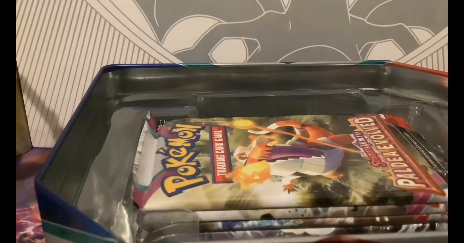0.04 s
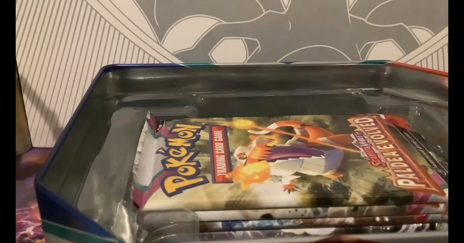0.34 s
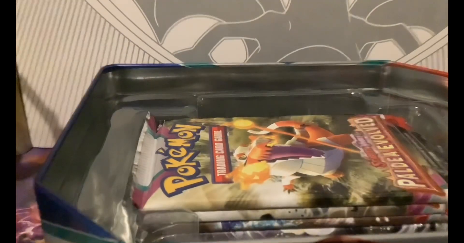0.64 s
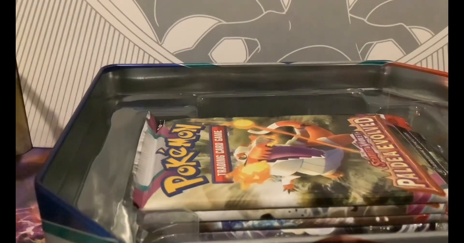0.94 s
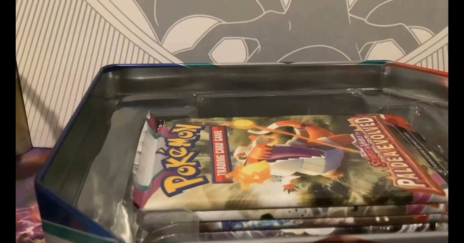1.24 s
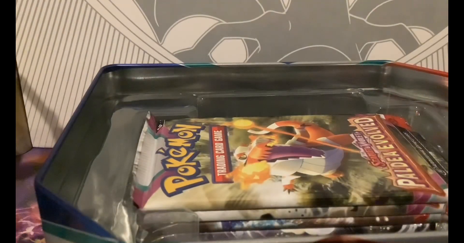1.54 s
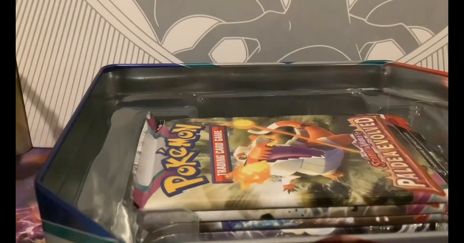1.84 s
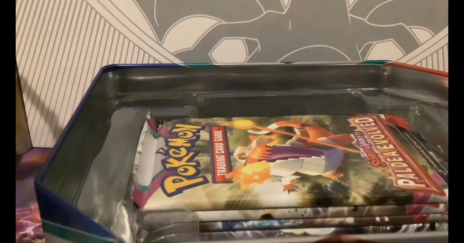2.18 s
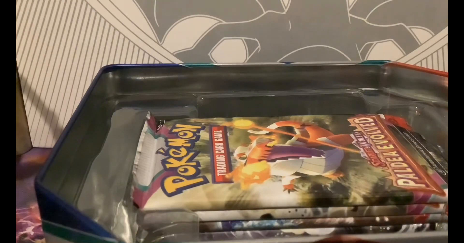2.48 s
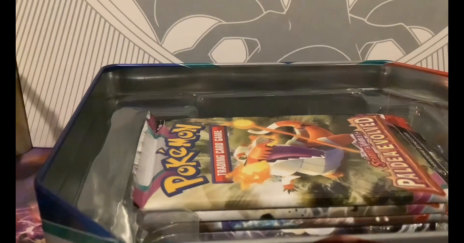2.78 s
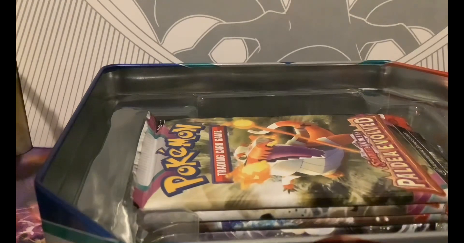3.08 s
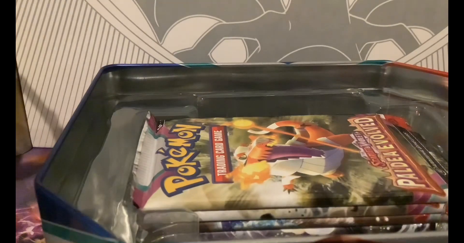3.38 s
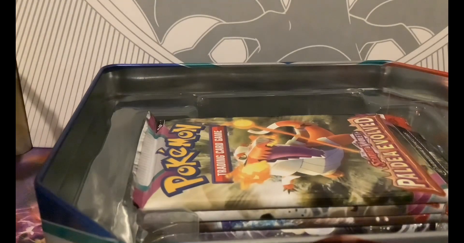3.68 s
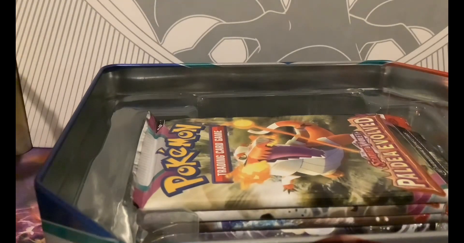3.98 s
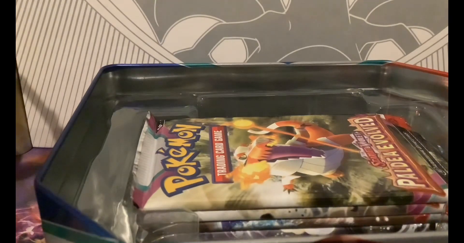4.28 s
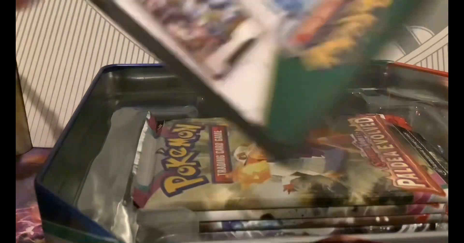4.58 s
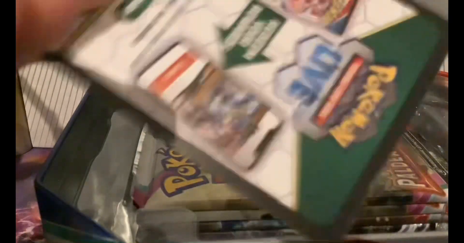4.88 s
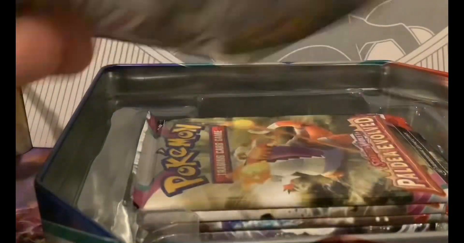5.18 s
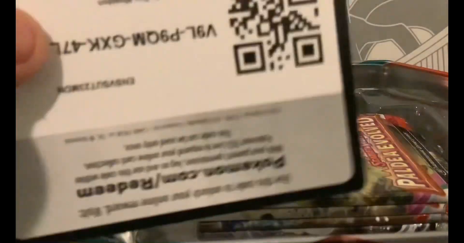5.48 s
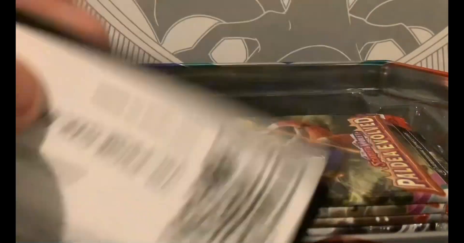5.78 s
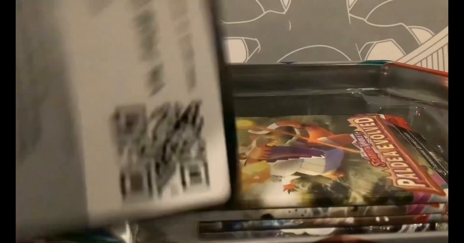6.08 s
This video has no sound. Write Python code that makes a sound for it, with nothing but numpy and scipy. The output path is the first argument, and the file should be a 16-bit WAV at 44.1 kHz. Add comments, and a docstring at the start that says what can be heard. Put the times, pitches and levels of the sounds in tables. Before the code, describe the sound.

Faint plastic ticks open the scene as hands work an insert inside a metal tin, close by. At about 0.6 seconds the plastic cracks and the tin bumps down on a table with a low thump. A sharp, loud snap comes at 1.1 seconds, followed by scraping, crackles and dull knocks until 1.7, the sheet metal ringing briefly with them. A lull follows, with only a faint rub and a small bump. Around 3 seconds the plastic scrapes and snaps again in a short, bright burst. Then a card slides free with a fine, soft hiss until about 4.5 seconds, ticking once at 3.7. From 4.3 to 5.4 seconds fingers flick, brush and tap the card, making light clicks and padded touches. A last soft swish comes near 6 seconds. Behind everything is a small, quiet room with a faint mains hum.

```python
"""A plastic insert scrapes and snaps as hands work it and cards out of a metal card tin, close by.
The insert sticks and slips along the wall, and the sheet metal rings with it; the tin bumps and lands
on the table with a low thump. A card slides free with a fine hiss and is flicked, brushed and tapped
in the fingers. Behind it all: a small room and a faint mains hum."""
import sys
import numpy as np
from scipy import signal
from scipy.fft import rfft, irfft
from scipy.io import wavfile
from scipy.ndimage import uniform_filter1d, map_coordinates

SR = 44100
rng = np.random.default_rng(int(sys.argv[2]) if len(sys.argv) > 2 else 0)


def log_audio(samples):
    """Write samples as a 16-bit WAV file to the path given in sys.argv[1]."""
    # one column per channel
    frames = np.atleast_2d(samples).T
    # limit to full scale, then quantise
    limited = np.clip(frames, -1, 1)
    pcm = np.round(limited * 32767).astype(np.int16)
    wavfile.write(sys.argv[1], SR, pcm)


N = 270333
T = np.arange(N) / SR
SOUND_M_S = 343


def amp(db):
    """Decibels to gain."""
    return 10 ** (np.asarray(db) / 20)


def unit(x):
    """Scale to rms 1."""
    return x / np.sqrt(np.mean(x ** 2))


def colour(x, points):
    """Shape by (f/Hz, level/dB) points; rms 1."""
    hz, db = np.transpose(points)
    log_hz = np.log(np.fft.rfftfreq(N, 1 / SR) + 1)
    return unit(irfft(rfft(x) * amp(np.interp(log_hz, np.log(hz), db)), N))


def band(x, hz, q):
    """Two-pole resonance, gain 1 at the centre."""
    w = 2 * np.pi * hz / SR
    a = np.sin(w) / (2 * q)
    return signal.lfilter([a, 0, -a], [1 + a, -2 * np.cos(w), 1 - a], x)


def muffle(x, hz):
    """One-pole low-pass."""
    return signal.sosfilt(signal.butter(1, hz, fs=SR, output="sos"), x)


def fade(t, t60_s):
    """Exponential decay."""
    return np.exp(-np.log(1000) * t / t60_s)


def walk(rate_hz):
    """Random wander, spread near 1."""
    step = int(SR / rate_hz)
    return uniform_filter1d(np.repeat(rng.standard_normal(N // step + 1), step), step)[:N]


def add(out, start_s, x):
    """Mix x into out."""
    i = max(int(start_s * SR), 0)
    out[i:i + len(x)] += x[:N - i]


def burst(envelope, hz, q, body):
    """Crackle with the envelope's energy: a resonance (Q capped) plus a broader body."""
    q = min(q, 3.5)
    broad = band(rng.choice([-1., 1.], len(envelope)) * envelope, hz, q)
    crackle = band(broad, hz, q) + body * broad
    return crackle * np.sqrt(np.sum(envelope ** 2) / np.sum(crackle ** 2))


def friction(per_s, spread_db, hiss):
    """Stick-slip grains of unequal size over smooth hiss."""
    grains = (rng.random(N) < per_s / SR) * rng.choice([-1., 1.], N)
    sizes = amp(spread_db * np.minimum(rng.exponential(size=N), 4))
    return unit(grains * sizes) + hiss * rng.standard_normal(N)


def stroke(start_s, length_s, exponent):
    """Loudness as a power of hand speed, from rest to rest."""
    speed = np.sin(np.pi * np.clip((T - start_s) / length_s, 0, 1))
    return np.maximum(speed, 0) ** exponent


# room air spectrum: f/Hz, level/dB
AIR_SPECTRUM = [(30, -40.5), (50, -14.5), (105, -5.5), (220, -18), (420, -27), (560, -22), (850, -38),
                (1600, -46), (11000, -51), (16000, -60)]

def background():
    """Still room air and a wavering mains hum."""
    air = colour(rng.standard_normal(N), AIR_SPECTRUM) * amp(-66.5 + walk(15))
    hum = amp(-65) * np.sin(2 * np.pi * 100.4 * T + 1.4 * walk(6.5)) * amp(2 * walk(10))
    return air + hum


# pushes on the insert: t/s, hold/s, level/dB
PUSHES = [(-.04, .43, -62), (0.526, 0.13, -53), (0.875, 0.87, -65), (1.133, 0.079, -39), (1.266, .06, -56),
          (1.332, 0.013, -43), (1.366, 0.11, -58), (1.493, 0.032, -50.5), (1.562, .04, -58),
          (1.594, 0.01, -44), (1.647, 0.13, -59.5), (1.776, 0.18, -68.5), (2.991, 0.029, -54),
          (3.005, .032, -38), (3.065, 0.034, -36.5), (3.085, 0.034, -32.5)]

def push_force(release_s=.027, creep_s=.19, creep_db=-23.5):
    """Each push grips, holds, lets go and creeps on; long pushes grip gently."""
    power = 0
    for start_s, hold_s, db in PUSHES:
        grip_s = .0017 + .013 * hold_s
        grip = 1 - np.exp(-np.maximum(T - start_s, 0) / grip_s)
        after_s = np.maximum(T - start_s - hold_s, 0)
        release = np.exp(-after_s / release_s) + amp(creep_db) * np.exp(-after_s / creep_s)
        power += (amp(db) * grip * release) ** 2
    return np.sqrt(power)


# judder spectrum: f/Hz, level/dB
JUDDER_SPECTRUM = [(35, -43.5), (60, -13.5), (207, -1), (363, -11), (585, -1), (698, -5.5), (1000, -9.5),
                   (1310, -17), (1780, -13.5), (4750, -12), (9790, -20.5), (16000, -25)]

def scrape(force, bite_db=-50, treble_floor=.065, catches_per_s=300, catch_s=.0011):
    """The insert judders along the tin wall; pressed harder, it brightens and catches."""
    slips = friction(per_s=3500, spread_db=3, hiss=.5)
    judder = colour(slips, JUDDER_SPECTRUM) * amp(2 * walk(170))
    dull = muffle(judder, hz=1702)
    onsets = rng.random(N) < catches_per_s / SR
    sizes = amp(4 * np.minimum(rng.standard_normal(N), 2))
    decays = signal.lfilter([1], [1, -np.exp(-1 / (catch_s * SR))], onsets * sizes)
    catches = unit(band(decays * rng.standard_normal(N), hz=5000, q=.27))
    bite = force ** 2 / (force ** 2 + amp(bite_db) ** 2)
    treble = (treble_floor + (1 - treble_floor) * bite) * (judder - dull)
    return (dull + treble + amp(-1) * bite * catches) * force


# wall and floor modes: f/Hz, relative level/dB, free t60/s
TIN_MODES = [(215, -15, 0.3), (565, -12, 0.3), (587.4, -2.5, 0.29), (614, -3, 0.5), (2424, -2, 0.36),
             (2850, 0, 0.11), (3250, 1, 0.09), (3750, -1, 0.086), (4480, 1.5, 0.1), (4880, -1.5, 0.14),
             (8450, -5, .16)]

def tin_ring(drive, held_t60_s=.32, detune=.013):
    """Hand-damped sheet metal rings; near-alike panels split each mode into a beating cluster."""
    t = T[:SR * 3 // 4]
    ring = 0
    for hz, db, t60_s in TIN_MODES:
        ratios = 1 + detune * (np.arange(-1, 2) + rng.uniform(-.5, .5, 3))
        cluster = np.sin(2 * np.pi * hz * np.outer(ratios, t)).sum(axis=0)
        ring += amp(db) * fade(t, min(t60_s, held_t60_s)) * cluster
    return amp(-56.5) * signal.fftconvolve(drive, ring)[:N]


# insert catching on the tin: t/s, level/dB, f/Hz, Q
INSERT_SNAPS = [(0.033, -52, 4000, 0.76), (0.159, -51.5, 4740, .5), (0.19, -51, 4200, 0.5),
                (.225, -49, 4600, 1.2), (0.295, -39.5, 2880, 0.66), (0.3289, -42, 2090, 0.47),
                (0.353, -44, 3840, 0.58), (0.3921, -46, 2730, 1.5), (0.518, -40, 2600, 0.33),
                (.549, -26.5, 3000, 0.62), (.614, -31.5, 2530, 1.5), (0.6321, -37, 2280, 1),
                (0.697, -42.5, 2800, 3.7), (1.047, -50, 4520, 1.3), (1.1394, -13.5, 4200, 1.5),
                (1.166, -28, 4200, .8), (1.176, -28, 3380, .7), (1.199, -26.5, 4800, 0.73),
                (1.211, -28, 4170, 1.1), (1.235, -34.5, 4150, 0.83), (1.336, -34.5, 3900, 0.95),
                (1.342, -29.5, 3930, 0.78), (1.378, -40.5, 4200, .6), (1.389, -35, 3100, 0.75),
                (1.547, -49, 4200, .4), (1.602, -31, 1500, 2), (1.609, -31.5, 4500, 0.59),
                (1.728, -47, 2200, 0.39), (2.935, -56, 3600, .9), (3.016, -19, 7000, 0.6),
                (3.039, -29.5, 6000, 0.68), (3.058, -33, 6500, 1.0), (3.092, -26, 2570, 0.6),
                (3.098, -22, 5470, 0.33), (3.11, -28.5, 6000, 0.53), (3.127, -33, 5000, .5),
                (3.168, -38, 7400, 1.7), (3.229, -40, 6850, 1.1)]

def snaps(force, light_ms=2.4, pressed_ms=4.28, midway_db=-51):
    """Thin plastic lets go with a crack and a dull wall knock; under pressure it rattles longer."""
    out, t = np.zeros(N), T[:SR // 10]
    onset = 1 - np.exp(-t / .00015)
    for start_s, db, hz, q in INSERT_SNAPS:
        pressure = force[int(start_s * SR):][:SR // 100].max()
        decay_ms = light_ms + (pressed_ms - light_ms) * pressure / (pressure + amp(midway_db))
        envelope = onset * np.exp(-1000 * t / decay_ms)
        knock_db = (db - 56.5) / 2  # grows half as fast as the crack
        knock = amp(knock_db) * burst(envelope, hz=1030, q=1, body=.5)
        crack = amp(db) * burst(envelope, hz, q, body=.5)
        add(out, start_s, crack + knock)
    return out


# tin and the packs in it bumping: t/s, level/dB, f/Hz
TIN_BUMPS = [(.548, -26, 262), (.551, -23.5, 150), (0.58, -27.5, 129), (0.553, -29, 626), (1.145, -37, 233),
             (1.214, -41.5, 108), (1.401, -36, 600), (1.502, -32.5, 99.7), (1.547, -35, 161),
             (1.581, -37, 72), (1.599, -33.5, 563), (1.605, -34.5, 105), (2.441, -56.5, 599),
             (2.535, -48, 550), (3.018, -34, 596)]

def bumps(contacts, sag=.35):
    """Padded contact: a damped low note that sinks as the pad spreads, plus a dull rattle."""
    out, t = np.zeros(N), T[:SR // 5]
    for start_s, db, hz in contacts:
        cycles = t * hz
        envelope = cycles * np.exp(1 - cycles)
        pitch_hz = hz * (1 + sag * (2 * np.exp(-cycles / 2) - 1))
        note = envelope * np.sin(2 * np.pi * np.cumsum(pitch_hz) / SR)
        rattle = amp(-8.5) * burst(envelope, 1.37 * hz, q=.82, body=.022)
        add(out, start_s, amp(db) * (note + rattle))
    return out


# tin set down: t/s, level/dB, f/Hz, pulse width/s
LANDING = (.637, -15.5, 96, .0075)
# table top mode: f/Hz, level/dB, t60/s
TABLE_MODE = (70, -22, .27)

def thump():
    """The tin's weight lands; the table top booms on."""
    peak_s, db, hz, width_s = LANDING
    boom_hz, boom_db, t60_s = TABLE_MODE
    t = T - peak_s
    impact = amp(db) * np.exp(-.5 * (t / width_s) ** 2) * np.cos(2 * np.pi * hz * t)
    after_s = np.maximum(t, 0)
    envelope = (1 - np.exp(-after_s / width_s)) * fade(after_s, t60_s)
    return impact + amp(boom_db) * envelope * np.cos(2 * np.pi * boom_hz * after_s)


# held card's modes: f/Hz, width/Hz, level/dB
CARD_MODES = [(2650, 470, 5), (3700, 2100, -0.5), (4940, 210, -5.5), (9300, 12000, -8)]

def card_modes(drive, max_q=22):
    """The card resonates: one signal per mode."""
    return [amp(db) * band(drive, hz, min(hz / width_hz, max_q)) for hz, width_hz, db in CARD_MODES]


def tin_reflection(x, detour_m=.6, wander=.03):
    """Direct sound plus a dull reflection; the hollow peaks shift with the hand. Rms 1."""
    lag_s = detour_m * (1 + wander * walk(7)) / SOUND_M_S
    reflected = map_coordinates(muffle(x, hz=1800), [(T - lag_s) * SR], order=1, mode="mirror")
    return unit(x + amp(-4) * reflected)


# sliding hiss spectrum: f/Hz, level/dB
HISS_SPECTRUM = [(90, -28.5), (170, 0.5), (400, -3.5), (570, 1), (760, -0.5), (1400, -7.5), (2500, -11),
                 (6000, -17), (16000, -10.5)]
# card-on-card strokes: t/s, length/s, level/dB, speed exponent, cutoff/Hz
CARD_SLIDES = [(1.953, 0.82, -63, 1.7, 2163), (3.117, 0.51, -60.5, 0.22, 10400),
               (3.613, 0.29, -62, 0.46, 7000), (3.862, 0.68, -59.5, .45, 11000),
               (5.889, 0.4, -60, 0.91, 11000)]

def slide():
    """Smooth card hisses; its edge scratches in short patches and ticks over specks."""
    hiss = colour(friction(per_s=3400, spread_db=9, hiss=6.2), HISS_SPECTRUM) * amp(2.6 * walk(45))
    catches = friction(per_s=2500, spread_db=3, hiss=.5)
    scratches = unit(sum(mode * amp(9.5 * walk(22)) for mode in card_modes(catches)[:3]))
    specks = unit(sum(card_modes(friction(per_s=41, spread_db=4, hiss=0))))
    rub = tin_reflection(hiss + amp(-4) * scratches + amp(-19) * specks)
    return sum(amp(db) * stroke(start_s, length_s, exponent) * muffle(rub, cutoff_hz)
               for start_s, length_s, db, exponent, cutoff_hz in CARD_SLIDES)


# card edge off a finger: t/s, level/dB, f/Hz, swell/ms, Q, reflection detour/m
CARD_FLICKS = [(3.725, -38, 1926, 0.76, 6.9, 0.352), (4.314, -40, 3070, 1.9, 0.82, 0.4),
               (4.471, -39, 3250, 4.6, 0.57, 0.26), (4.4973, -34.5, 1600, 0.6, 3, .57),
               (4.495, -36, 10630, 0.45, 3.8, 0.23), (4.738, -42.5, 8000, 0.85, 0.61, 0.42),
               (4.982, -34, 1760, 0.25, 0.62, 0.41), (5.051, -36, 4400, 7.2, 0.56, 0.54),
               (5.171, -54.5, 3400, 0.46, 0.84, 0.44), (5.195, -50.5, 6600, 0.77, 0.8, 0.48),
               (5.238, -44.5, 3470, 1.5, 3, 0.3)]

def flicks(stop_s=.002, reflection_db=-3.5):
    """The edge drags, slips off and stops short; a reflection off the tin makes it hollow."""
    out, lead = np.zeros(N), SR // 25
    t = T[:2 * lead] - T[lead]
    reflection = amp(reflection_db)
    for peak_s, db, hz, swell_ms, q, detour_m in CARD_FLICKS:
        envelope = np.exp(np.minimum(1000 * t / swell_ms, -t / stop_s))
        flick = amp(db) * burst(envelope, hz, q, body=2.9) / np.hypot(1, reflection)
        start_s = peak_s - T[lead]
        add(out, start_s, flick)
        add(out, start_s + detour_m / SOUND_M_S, reflection * flick)
    return out


# fingers brushing the card: middle t/s, length/s, face level/dB, edge level/dB
FINGER_SWISHES = [(3.932, 0.1, -63, -69), (4.196, 0.053, -59.5, -66), (4.339, 0.079, -57.5, -79),
                  (4.47, 0.25, -61, -88), (4.71, 0.23, -75.5, -89), (4.924, 0.55, -77.5, -81.5),
                  (5.08, 0.53, -73.5, -75), (5.231, 0.089, -70, -62), (5.383, 0.16, -73, -69.5),
                  (5.816, 0.24, -67.5, -68.5)]

def swishes(edge_hz=7900, spread_octaves=.4):
    """Skin brushes the card and its edge whistles; resonances flicker as the grip shifts."""
    rub = friction(per_s=1600, spread_db=7, hiss=1)
    face = unit(sum(mode * amp(5 * walk(20)) for mode in card_modes(rub)))
    whistles = 0
    for octaves in spread_octaves * np.linspace(-1, 1, 7):
        taper = 4 ** -abs(octaves)
        whistles += taper * band(rub, edge_hz * 2 ** octaves, q=20) * amp(6.5 * walk(24))
    edge = unit(whistles)
    out = np.zeros(N)
    for middle_s, length_s, face_db, edge_db in FINGER_SWISHES:
        swell = stroke(middle_s - length_s / 2, length_s, exponent=1.6)
        out += swell * (amp(face_db) * face + amp(edge_db) * edge)
    return out


# fingertips on the card: t/s, level/dB, f/Hz
FINGER_TAPS = [(4.316, -42, 176), (4.476, -39, 112), (4.497, -32, 485), (4.739, -48, 313),
               (4.981, -33, 263), (5.05, -46.5, 154), (5.173, -47.5, 229), (5.196, -42, 249),
               (5.236, -48.5, 179), (5.384, -43.5, 217), (5.944, -53, 790)]

def taps():
    """Fingertips press on the held card as padded contacts."""
    return bumps(FINGER_TAPS)


def room(x):
    """Small furnished room: a short diffuse tail, treble dying first."""
    t = T[:SR // 2]
    noise = rng.standard_normal(len(t)) * (1 - np.exp(-t / .00019))
    mids = band(noise, hz=700, q=.24) * fade(t, t60_s=.42)
    treble = amp(-2) * band(noise, hz=4800, q=.2) * fade(t, t60_s=.14)
    tail = unit(mids + treble) / np.sqrt(len(t))
    return amp(-15.5) * signal.fftconvolve(x, tail)[:N]


def scene():
    """Insert and bumps drive the tin; the card, being close, stirs the room less."""
    force = push_force()
    insert = snaps(force) + scrape(force)
    knocks = bumps(TIN_BUMPS)
    tin = insert + knocks + tin_ring(insert + amp(-5.5) * knocks) + thump()
    card = flicks() + taps() + slide() + swishes()
    return (tin + card + room(tin + amp(-4) * card) + background())[None]


def record(dry, low_hz=35, top_hz=16000):
    """The microphone drops the deepest bass and the very top."""
    dry = signal.sosfilt(signal.butter(2, low_hz, "high", fs=SR, output="sos"), dry)
    return signal.sosfilt(signal.ellip(8, .2, 70, top_hz, fs=SR, output="sos"), dry)


dry = scene()
out = record(dry)
log_audio(out)
```